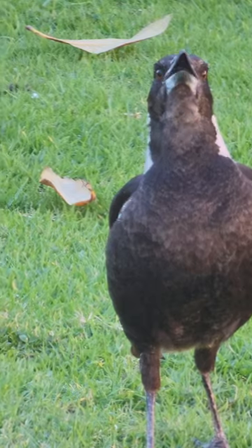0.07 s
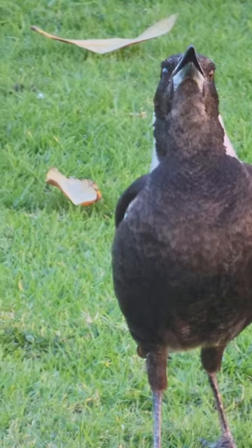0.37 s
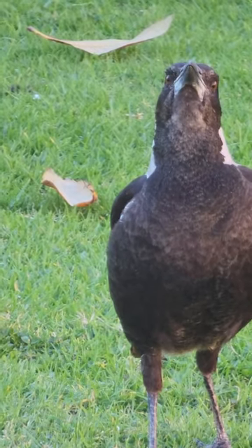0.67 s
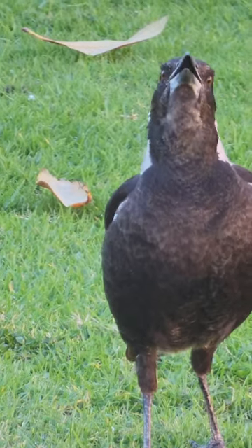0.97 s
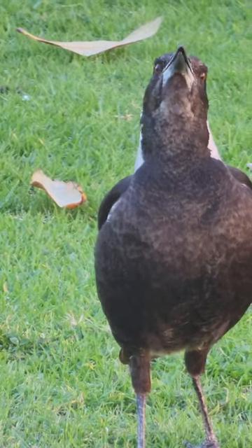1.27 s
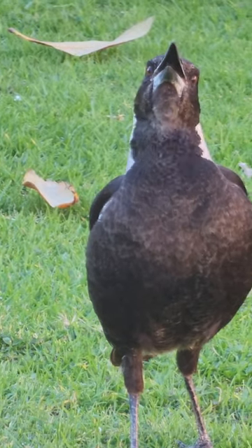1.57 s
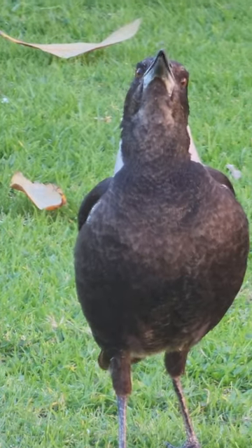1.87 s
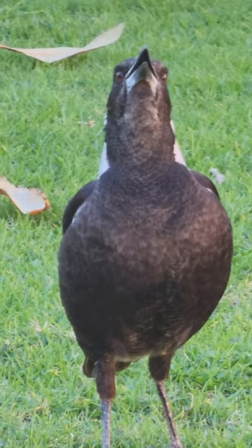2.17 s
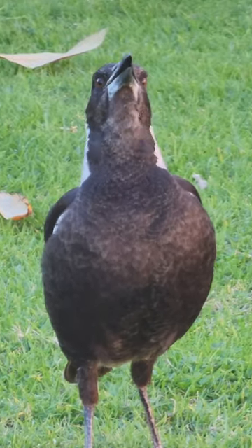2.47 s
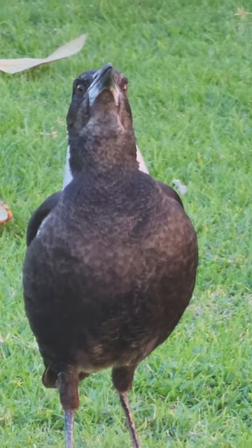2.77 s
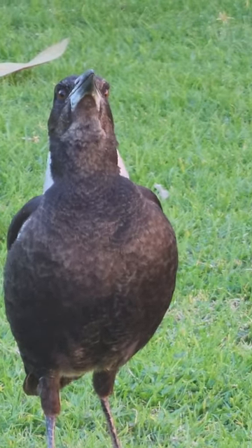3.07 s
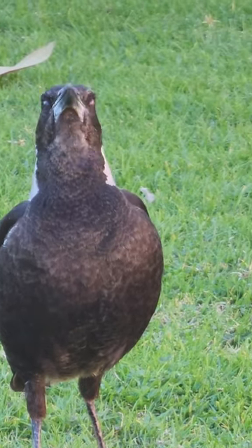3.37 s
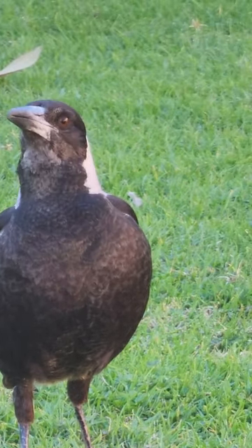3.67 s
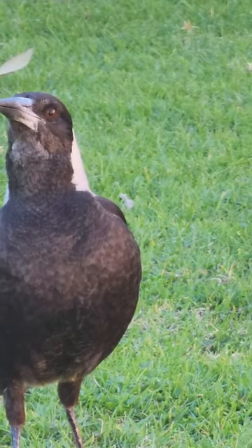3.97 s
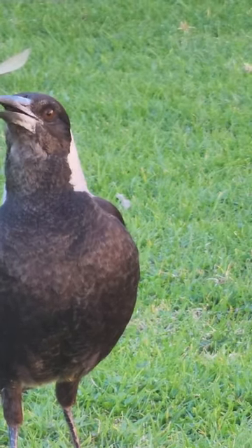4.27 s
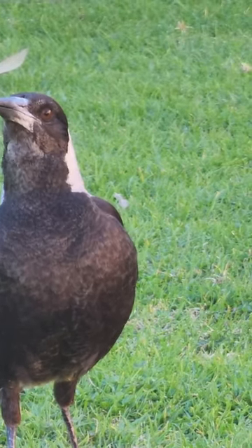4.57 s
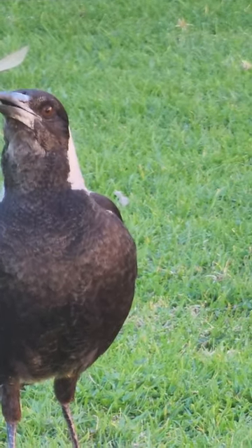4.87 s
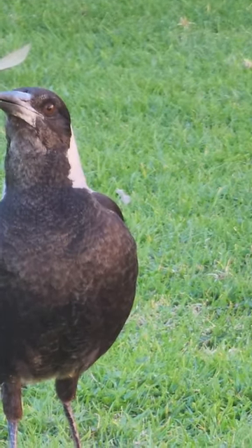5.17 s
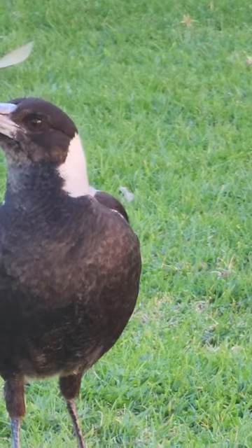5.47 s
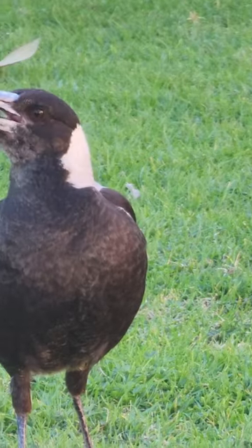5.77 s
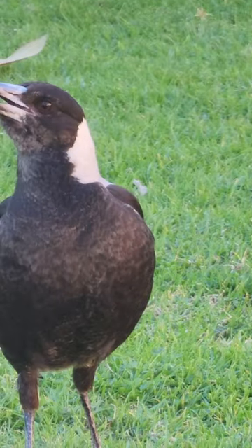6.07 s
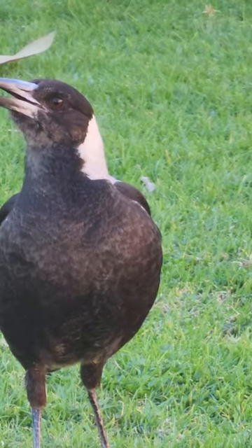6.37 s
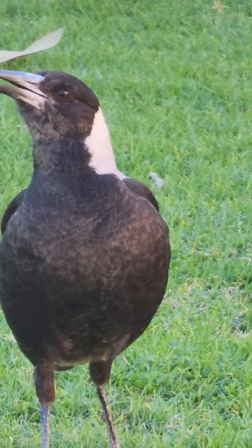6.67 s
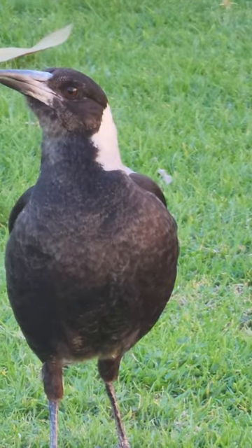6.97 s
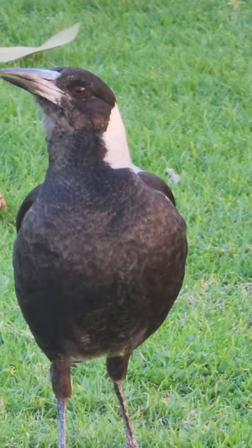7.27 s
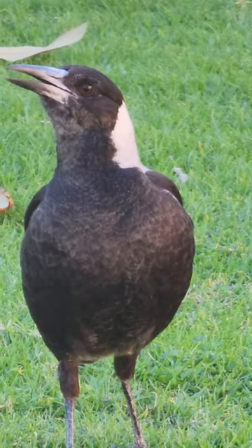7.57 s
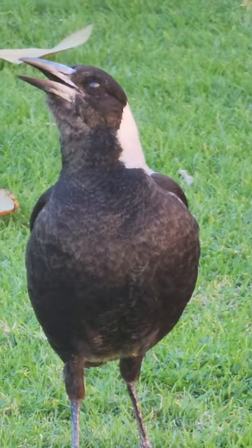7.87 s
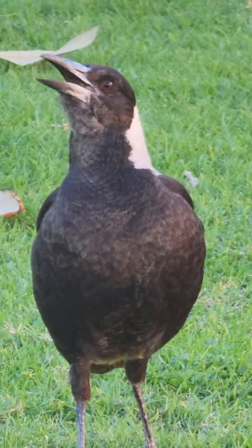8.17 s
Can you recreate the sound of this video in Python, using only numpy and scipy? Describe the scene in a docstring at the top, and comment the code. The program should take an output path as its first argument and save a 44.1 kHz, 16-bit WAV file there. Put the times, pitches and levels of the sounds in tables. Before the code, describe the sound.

A magpie warbles and carols close by in short gliding phrases with brief pauses, over a low outdoor rumble and light wind.

```python
"""A magpie warbles and carols close by on a lawn, over a low outdoor rumble with light wind.
Airflow sets a membrane vibrating on each side of its syrinx; the two sing gliding notes, often at once,
some pure and some fluttering. Throat and beak filter the overtones: one soft phrase is sung with the
beak shut, and later come two calls with it wide open. The garden reflects the song, and small birds
cheep faintly further off."""
import sys
import numpy as np
from scipy import signal
from scipy.fft import rfft, irfft
from scipy.io import wavfile
from scipy.ndimage import map_coordinates

SR = 44100
rng = np.random.default_rng(int(sys.argv[2]) if len(sys.argv) > 2 else 0)


def unload_wav(signal):
    """Save mono or channel-first audio to the path in sys.argv[1] as 16-bit WAV at rate SR, clipped to [-1, 1]."""
    wavfile.write(
        sys.argv[1],
        SR,
        np.round(np.clip(np.atleast_2d(signal).T, -1, 1) * 32767).astype(np.int16),
    )


N = 362061
TIME = np.arange(N) / SR

# Short notes of the warble. Levels in all tables are relative; roughness runs from 0 to about 1.
# start_s, rise_s, fall_s, start_hz, crest_hz, end_hz, fundamental_db, overtones_db, roughness
WARBLE_NOTES = [ (.11, 0.0028, 0.1, 1297, 1282, 1374, -36, -53, 0.65),
                (.11, 0.0056, 0.017, 1920, 1777, 1620, -28.5, -48, 0.54),
                (.3, .04, 0.047, 1147, 1074, 1057, -46, -70, 0.07),
                (.422, .006, 0.02, 1324, 1487, 2060, -15, -30.5, 0.29),
                (.446, 0.0094, 0.023, 1531, 1618, 1790, -19, -34, 0.36),
                (.474, .01, 0.039, 1754, 1667, 1360, -18.5, -40, 0.47),
                (.512, 0.0325, 0.042, 1420, 1358, 1327, -14.5, -33, 0.23),
                (.973, 0.0052, 0.022, 1945, 1870, 1630, -34, -52, 0.25),
                (1.006, 0.0041, 0.05, 1623, 1723, 1685, -28.5, -44.5, 0.48),
                (1.055, .017, 0.092, 1476, 1367, 1274, -19, -30.5, 0.25),
                (1.13, .066, 0.02, 1317, 1263, 1210, -15.5, -31.5, 0.11),
                (1.08, .115, 0.023, 860, 840, 770, -37, -66, 0.33),
                (1.236, .008, 0.058, 1483, 1582, 1190, -29.5, -49, 0.88),
                (1.312, 0.042, 0.07, 1014, 985.9, 1041, -30, -53.5, 0.11),
                (1.385, 0.038, 0.008, 1460, 1525, 1560, -27.5, -37, 0.64),
                (1.432, .009, 0.015, 685, 665, 853, -28.5, -54, 0.13),
                (1.44, 0.041, .01, 1027, 1043, 1055, -36.5, -54, 0.23),
                (1.497, 0.017, 0.012, 768, 790, 814, -32.5, -55, 0.25),
                (1.527, .016, .011, 1449, 1573, 1390, -8.5, -26, 0.12),
                (1.552, 0.0037, 0.027, 1406, 1370, 1416, -17.5, -24.5, 0.77),
                (1.578, .03, 0.016, 1006, 861, 850, -37, -45, 0),
                (1.585, 0.057, 0.024, 1934, 1580, 1620, -18.5, -40, 0.18),
                (1.66, 0.02, 0.0068, 1566, 1580, 1580, -25, -55, 0.5),
                (1.66, .095, 0.047, 1294, 1323, 1260, -35.5, -39.5, 0.11),
                (1.7, .1, 0.052, 2394, 2525, 2470, -26, -29, 0.58),
                (1.815, .04, 0.069, 1064, 1036, 1099, -31.5, -38, 0.43),
                (1.89, 0.032, 0.057, 1103, 1083, 1043, -25.5, -54.5, 0.07),
                (2.019, .012, .095, 1396, 1337, 1373, -26, -40.5, 0.65),
                (2.12, .04, 0.014, 1373, 1439, 1670, -13.5, -32, 0.37),
                (2.076, .039, 0.029, 725.6, 719, 792, -33.5, -45, 0),
                (2.225, 0.026, 0.019, 1080, 1072, 1049, -29, -48, 0.2),
                (2.29, .025, 0.081, 1543, 1555, 1470, -27.5, -48.5, .1),
                (2.438, 0.01, 0.0092, 856, 818, 840, -21.5, -41, .15),
                (2.455, 0.073, 0.014, 1524, 1573, 1580, -36.5, -38, 0.44),
                (2.54, 0.017, 0.047, 1128, 1123, 1085, -29, -42.5, 0.34),
                (2.657, 0.0026, 0.0088, 1910, 1790, 1584, -32, -52, 0.23),
                (2.678, 0.0085, 0.049, 1480, 1475, 1477, -21.5, -44.5, 0.37),
                (2.732, 0.02, 0.028, 867, 749.5, 833, -30.5, -50.5, .1),
                (2.864, .007, 0.047, 605, 689, 904, -30, -54.5, 0.3),
                (2.898, .024, 0.043, 778, 765, 660, -24, -54, 0.1),
                (2.972, .005, 0.0088, 805, 890, 1110, -27, -43, 0.44),
                (2.99, 0.036, 0.031, 1081, 1049, 1070, -32, -54.5, 0.08),
                (3.048, 0.015, 0.03, 561, 785, 562, -33, -61, 0.42),
                (3.106, .014, .032, 1228, 1248, 1212, -38.5, -57, 0.3),
                (3.178, .06, 0.074, 757, 831, 830, -22, -47, 0.06),
                (3.265, 0.0746, 0.035, 1034, 1030, 1000, -29.5, -44.5, 0.25),
                (3.358, 0.05, 0.032, 1460, 1535, 1598, -39.5, -50, 0.08),
                (3.426, 0.016, 0.053, 907, 1107, 1105, -36, -47, 0.22),
                (3.788, .007, 0.015, 735, 683, 656, -25, -55, 0.15),
                (3.812, 0.035, 0.018, 789.6, 848, 890, -38, -66, 0.6),
                (3.88, 0.034, 0.042, 794.8, 848, 996, -31, -54.5, 0.29),
                (3.945, 0.044, .03, 1034, 1073, 976, -37, -56, 0),
                (4.01, .085, 0.037, 978, 1011, 970, -24.5, -45, 0.18),
                (3.955, .021, 0.022, 609, 737, 545, -33, -55.5, 0.38),
                (4.03, .015, 0.014, 627, 800, 885, -26.5, -54, 0.48),
                (4.052, .046, 0.033, 855, 918, 872, -21.5, -44.5, 0.16),
                (4.16, 0.0091, 0.048, 566, 617, 827, -37, -60, .45),
                (4.22, .012, 0.011, 825, 756.5, 800, -22.5, -47, 0.3),
                (4.25, .033, 0.026, 802, 874, 810, -36, -55, 0.42),
                (4.318, .018, 0.08, 688, 634, 601.5, -27.5, -52, .03),
                (4.405, .025, 0.022, 603, 727, 1080, -32.5, -52.5, 0.19),
                (4.473, 0.031, .017, 955, 983, 930, -30, -44.5, .18),
                (4.508, 0.012, 0.033, 962, 866, 861, -25, -44.5, 0.16),
                (4.753, 0.0064, 0.0071, 892, 772, 840, -20, -43.5, 0.54),
                (4.77, 0.0089, 0.028, 859, 885, 886, -33.5, -50, 0.37),
                (4.845, .029, 0.054, 664, 632.5, 665, -26, -51.5, 0.01),
                (4.912, 0.023, 0.053, 662, 731, 669, -25.5, -50.5, 0.2),
                (5.032, 0.0397, 0.029, 1049, 964, 965, -25, -44, 0.21),
                (5.214, .005, 0.016, 899, 788, 647, -25, -52.5, 0.37),
                (5.234, 0.012, 0.011, 686, 888, 982, -32, -59, 0),
                (5.685, 0.027, 0.043, 1664, 1724, 1710, -38, -55, 1.06),
                (5.806, 0.0072, 0.03, 1790, 1644, 1380, -22, -31, 0.5),
                (5.839, 0.0031, 0.026, 1550, 1446, 1550, -19, -30, 0.8),
                (6.132, .031, 0.011, 1349, 1268, 1250, -23, -38.5, 0.65),
                (6.169, 0.012, 0.0046, 1394, 1765, 1930, -13.5, -26.5, 0),
                (6.202, 0.012, 0.03, 1980, 1760, 1713, -29, -40, 0.88),
                (6.548, 0.024, 0.026, 1306, 1400, 1496, -16.5, -38, 0.27),
                (7.226, 0.023, 0.026, 996, 969, 1009, -33.5, -85, 0.29),
                (7.31, .025, .04, 1420, 1385, 1325, -33, -60, 0.11),
                (7.375, 0.027, .08, 1012, 913, 880, -27, -51, 0.18),
                (7.488, 0.027, 0.0082, 790, 833, 830, -40, -48.5, 0.42),
                (7.52, 0.0876, 0.015, 1110, 1151, 1175, -30.5, -39, 0.42),
                (7.699, 0.029, .04, 1394, 1293, 1233, -25.5, -42.5, 0.48),
                (7.77, .007, 0.024, 956, 1028, 1160, -31, -42, 0.42),
                (7.915, 0.058, 0.15, 983, 975, 956, -44, -37.5, 0.22),
                (8.115, .035, 0.0074, 899, 803, 788, -38.5, -55, 0.01),
                (8.165, 0.052, .01, 1060, 1097, 1055, -21.5, -38, 0.18), ]
# Long carols, one curve each: time_s, pitch_hz, fundamental_db, overtones_db, roughness
CAROL_CURVES = [
    [(.215, 1664, -35, -41, 0.71), (.25, 1601, -20, -32.5, 0.99), (.27, 1588, -13, -35.5, 0.18),
     (.32, 1516, -20, -33.5, 0.1), (.392, 1437, -15, -29.5, 0.03), (.418, 1190, -25.5, -31.5, 0.26)],
    [(2.185, 1380, -25, -51, 0.6), (2.215, 1390, -20, -25.5, 0.63), (2.24, 1317, -15, -28.5, 0.2),
     (2.28, 1308, -17, -29, 0), (2.37, 1301, -21, -32, 0.03), (2.41, 1300, -25.5, -31.5, 0.8),
     (2.45, 1300, -29.5, -51, 0.97), (2.52, 1357, -27, -42.5, 1.07)],
    [(6.6, 1750, -41, -41, 0.8), (6.655, 1832, -30, -30.5, 0.36), (6.68, 1680, -27, -31.5, 0.34),
     (6.7, 1320, -24.5, -35, .26), (6.745, 1253, -21, -38, 0.1), (6.775, 1256, -28, -46, 0),
     (6.8, 1263, -31, -49, 0.1), (6.88, 1249, -36, -88, .08)],
    [(7.785, 1654, -42.5, -49, 0.8), (7.835, 1575, -23, -35.5, 0.3), (7.865, 1607, -20.5, -36, 0.28),
     (7.95, 1460, -14.5, -25, 0.25), (8.0, 1418, -17, -26.5, 0.3), (8.085, 1360, -21, -30, 0.35),
     (8.11, 1419, -19, -31.5, 0.34), (8.135, 1232, -28.5, -36.5, 0.2), (8.17, 1092, -42, -55, 0.4)],
]
# Response of throat and beak in ordinary song: frequency_hz, gain_db
SONG_TRACT = [(400, -12), (1400, 6.5), (2100, -6), (2450, 0), (2800, -12), (3150, -2), (3500, -10),
              (3850, -4.5), (4200, -9.5), (4850, 0.5), (5700, -5), (6200, -17.5), (6900, -13), (7700, -16),
              (8700, -19), (10500, -18.5), (11400, -23.5), (13100, -10.5), (14200, -21.5), (15200, -21)]
# Left channel over right for the birds: frequency_hz, difference_db
STEREO_BALANCE = [(700, 2.5), (1300, 2), (2300, -1), (4400, 1.5), (8100, 4), (14000, 10)]
# Course of the wind and distant rumble: time_s, deep_level_db, upper_level_db
RUMBLE_LEVELS = [(0.14, -46, -40.5), (0.27, -26.5, -35), (0.4, -32, -42.5), (0.67, -25.5, -32),
                 (1.2, -35.5, -37.5), (1.46, -30, -34), (2.25, -45.5, -40.4), (2.649, -25, -34),
                 (2.78, -37, -34.5), (3.44, -26.5, -37), (3.58, -31.5, -39), (3.97, -38.3, -38),
                 (4.1, -34.4, -35.8), (4.37, -46.5, -40.0), (4.9, -26.5, -41), (5.03, -39.5, -39.5),
                 (7.01, -42.5, -45.5), (8.2, -32.5, -43.5)]
# Spectra of the deep rumble, the upper rumble and the open air: frequency_hz, density_db
DEEP_SPECTRUM = [(15, -6), (25, -4), (40, 5.5), (58, 9), (80, 4.5), (110, -17.5), (160, -68)]
UPPER_SPECTRUM = [(55, -13), (90, 6.5), (130, 6.5), (160, 1.5), (200, -7), (260, -9), (400, -53.5)]
AIR_SPECTRUM = [(150, -6), (260, 0), (400, -4), (650, -6), (1200, -8), (2000, -17), (3000, -27),
                (5000, -33), (8000, -37), (10000, -46), (15500, -47)]
# Thin cheeps of distant birds: start_s, length_s, start_hz, end_hz, level_db
DISTANT_CHEEPS = [(0.73, 0.057, 6070, 5500, -65), (4.492, 0.17, 2985, 2950, -51),
                  (4.518, 0.15, 4240, 3850, -61.5)]
# Response of the throat with the beak shut, then wide open: frequency_hz, gain_db
SHUT_TRACT = [(400, -24), (1300, 8.5), (2000, -3.5), (2600, -9.5), (3050, -8.5), (3700, -17), (5000, -8),
              (5800, -1), (6500, -13), (7200, -6), (9000, -18.5), (11500, -19.5), (13300, -11.5),
              (14500, -17)]
OPEN_TRACT = [(900, 2.5), (1750, 13.5), (2600, -9), (3500, -12.5), (4200, -18), (5200, -1), (6000, -7),
              (7000, -25), (8200, -8.5), (9500, -39), (10800, -24), (11900, -34), (13200, -23),
              (15500, -34)]
# Two open-beak calls of two syllables each:
# start_s, length_s, pitch_hz, end_hz, overshoot_hz, flick_hz, fundamental_db, overtones_db
CALL_SYLLABLES = [ (5.753, 0.052, 901, 873, 330, -3, -42, -33),
                  (5.836, 0.17, 925.6, 883, 380, 40, -37, -32), (6.236, 0.083, 873, 842, 32, 22, -36, -39),
                  (6.325, 0.15, 886, 817.6, 12, -23, -36, -34), ]

ONSET_S, TOP_HZ = 0.113, 15800
SHUT_FROM_S, SHUT_TO_S = 3.7, 5.4  # the phrase sung with the beak shut


def undb(db):
    """Amplitude ratio of a level in decibels."""
    return 10 ** (np.asarray(db) / 20)


def unit_rms(x):
    """Normalisation to an rms of 1."""
    return x / np.sqrt(np.mean(x ** 2))


def wobble(n, hz):
    """Random modulation, band-limited to about hz, with a spread near 1."""
    knots = rng.standard_normal(512)
    return map_coordinates(knots, [np.arange(n) * 2 * hz / SR], order=3, mode="wrap")


def gains(curve):
    """Frequency response: a decibel curve interpolated over log frequency, one gain per bin."""
    hz, db = np.transpose(curve)
    bins_hz = np.fft.rfftfreq(N, 1 / SR)
    return undb(np.interp(np.log(np.maximum(bins_hz, 1)), np.log(hz), db))


def filtered(source, curve):
    """Linear filtering: the source spectrum is multiplied by a frequency response."""
    return irfft(rfft(source) * gains(curve), N)


def warble_note(start_s, rise_s, fall_s, start_hz, crest_hz, end_hz, db, over_db, rough):
    """Threshold of voicing: a note's curve rises from near it to a crest and is roughest at the ends."""
    threshold_db = -43.5
    t = np.arange(-rise_s, fall_s, 1 / 2000)
    away = np.abs(t) / np.where(t < 0, rise_s, fall_s)  # 0 at the crest, 1 at both ends
    edge_hz = np.where(t < 0, start_hz, end_hz)
    hz = crest_hz + (edge_hz - crest_hz) * away ** 1.35  # the pitch lingers at the crest
    drop_db = np.where(t < 0, 0.51, 0.47) * (db - threshold_db) * away ** 0.71
    roughness = rough * (1 + 0.64 * away)
    return np.transpose([start_s + rise_s + t, hz, db - drop_db, over_db - 0.41 * drop_db, roughness])


def membrane(curve, edge_s=0.007, trill_hz=110, trill=0.27, gargle=0.42, flutter=0.48, tremble_db=1.5):
    """Amplitude and phase modulation: one side of the syrinx follows a curve, unsteadily if rough."""
    times, *columns = np.transpose(curve)
    at = np.arange(int((times.min() - edge_s) * SR), min(N, int((times.max() + edge_s) * SR)))
    t, n = TIME[at], len(at)
    hz, db, over_db, rough = (np.interp(t, times, column) for column in columns)
    from_edge_s = np.minimum(t - t[0], t[-1] - t)
    envelope = np.sin(np.pi / 2 * np.clip(from_edge_s / (2 * edge_s), 0, 1)) ** 2
    # even a pure note trembles a little in pitch and strength
    hz *= 1 + 0.0045 * wobble(n, 30.12)
    envelope *= undb(tremble_db * wobble(n, 39.8))
    # rough notes beat in a fast uneven trill; every other beat is weaker, so they gargle
    trill_phase = 2 * np.pi * np.cumsum(trill_hz * (1 + 0.12 * wobble(n, 30.3))) / SR
    envelope *= 1 + gargle * np.sqrt(np.abs(rough)) * np.sin(trill_phase / 2)
    swing = 1 + rough * (trill * np.sin(trill_phase) + flutter * wobble(n, 170))
    swing_rms = np.sqrt(1 + rough ** 2 * (trill ** 2 / 2 + flutter ** 2))
    envelope *= swing / swing_rms
    phase = 2 * np.pi * np.cumsum(hz) / SR + rough * wobble(n, 190)  # the cycles scatter
    return at, hz, phase, envelope * undb(db), envelope * undb(over_db), rough


def syrinx(curves, tract, tone_db, overtone_db, even_db, coupling, rasp, hoarse, rush):
    """Source and filter: two coupled membranes sound, and the tract gathers their overtones into bands."""
    voices = [membrane(curve) for curve in curves]
    tones, drive, buzz = np.zeros((3, N))
    for at, hz, phase, fundamental, overtones, rough in voices:
        tones[at] += fundamental * np.sin(phase)
        drive[at] += np.abs(fundamental)
    for at, hz, phase, fundamental, overtones, rough in voices:
        n = len(at)
        # when both sides sound, each bends the other's cycle and makes sidebands
        other_drive = np.maximum(drive[at] - np.abs(fundamental), 0)
        other_side = (tones[at] - fundamental * np.sin(phase)) / np.sqrt(drive[at] * other_drive + 1e-10)
        # the moment of closing scatters, which smears the high overtones most
        closing = 2 * np.pi * np.cumsum(hz) / SR + coupling * other_side + rasp * rough * wobble(n, 220)
        # rough or hard-pushed notes are hoarse: each overtone widens into a reedy band
        spread = hoarse * (np.sqrt(np.abs(fundamental) / drive.max()) + np.abs(rough))
        for k in range(2, int(TOP_HZ / hz.min()) + 1):
            harmonic_db = even_db * (2.5 - k % 2) + rng.uniform(-4, 4)
            weight = undb(harmonic_db) * (k * hz < SR / 2)
            buzz[at] += overtones * weight * np.sin(k * closing + spread * wobble(n, 165))
        # air rushes through the gap once a cycle and fills in between the overtones
        buzz[at] += overtones * rush * (1 + np.cos(phase)) * rng.standard_normal(n)
    return np.sqrt(2) * (undb(tone_db) * tones + undb(overtone_db) * filtered(buzz, tract))


def stereo_arrival(sound, lag_s=51e-6):
    """Path difference and shadowing: the right microphone hears later, its treble shaded by the housing."""
    delay = np.exp(-2j * np.pi * np.fft.rfftfreq(N, 1 / SR) * lag_s)
    left_over_right = gains(STEREO_BALANCE)
    pair = np.array([left_over_right, delay]) * np.sqrt(2 / (1 + left_over_right ** 2))
    return irfft(rfft(sound) * pair, N)


def garden(sound, near_t60_s=0.35, echo_s=0.13, echo_spread_s=0.076, tail_t60_s=0.9, dull_hz=2600):
    """Reflection: quick returns from things close by, a smeared far echo and a short dull tail."""
    t = TIME[:SR]
    near, echo, tail = rng.standard_normal((3, 2, SR))
    build_up = np.clip(t / 0.0039, 0, 1)
    near = undb(-8.5) * unit_rms(near * build_up * undb(-60 * t / near_t60_s))
    echo = undb(-21) * unit_rms(echo * np.exp(-((t - echo_s) / echo_spread_s) ** 2))
    tail = undb(-18) * unit_rms(tail * build_up * undb(-60 * t / tail_t60_s))
    far = signal.sosfilt(signal.butter(1, dull_hz, fs=SR, output="sos"), echo + tail)
    impulse_response = (near + far) / np.sqrt(SR)
    return signal.fftconvolve(sound, impulse_response, axes=1)[:, :N]


def stereo_noise(spectrum, side_db):
    """Partial coherence: a side signal of opposite sign in each channel widens noise of rms 1."""
    mid, side = filtered(rng.standard_normal((2, N)), spectrum)
    return unit_rms(mid + undb(side_db) * np.array([side, -side]))


def outdoors(buffet_db=2.5, hum_hz=57.1, hum_db=-43.5, air_db=-49):
    """Superposition: two bands of wind-buffeted rumble, a wavering distant hum and soft open air."""
    times, *levels = np.transpose(RUMBLE_LEVELS)
    deep_db, upper_db = (np.interp(TIME, times, level) for level in levels)
    deep = stereo_noise(DEEP_SPECTRUM, side_db=-4.5) * undb(deep_db + buffet_db * wobble(N, 5.8))
    upper = stereo_noise(UPPER_SPECTRUM, side_db=-7) * undb(upper_db + 1 + buffet_db * wobble(N, 10))
    hum_phase = 2 * np.pi * np.cumsum(hum_hz + 1.24 * wobble(N, 1.3)) / SR
    hum = np.sqrt(2) * undb(hum_db) * np.sin(hum_phase)
    air = stereo_noise(AIR_SPECTRUM, side_db=-7) * undb(air_db + 0.6 * wobble(N, 3))
    return deep + upper + hum + air


def cheeps(waver=0.034):
    """Frequency modulation: small birds further off sing short tones that waver as they fall."""
    out = np.zeros(N)
    for start_s, length_s, start_hz, end_hz, db in DISTANT_CHEEPS:
        n, i = int(length_s * SR), int(start_s * SR)
        hz = np.linspace(start_hz, end_hz, n) * (1 + waver * wobble(n, 150))
        out[i:i + n] += 2 * undb(db) * np.hanning(n) * np.sin(2 * np.pi * np.cumsum(hz) / SR)
    return out


def call_syllable(start_s, length_s, pitch_hz, end_hz, overshoot_hz, flick_hz, db, over_db):
    """Onset and release transients: a call's curve starts sharp and rough, settles, swells and flicks."""
    settle_s, flick_s, swell_db, rough_per_hz = 0.06, 0.017, 1, 0.0024
    t = np.arange(0, length_s, 1 / 2000)
    sharp = overshoot_hz * np.maximum(1 - t / settle_s, 0)
    flick = flick_hz * np.maximum(1 - (length_s - t) / flick_s, 0)
    to_go = 1 - t / length_s
    hz = end_hz + (pitch_hz - end_hz) * to_go + sharp + flick
    drop_db = swell_db * to_go
    return np.transpose([start_s + t, hz, db - drop_db, over_db - drop_db, rough_per_hz * sharp])


def scene():
    """Direct and reverberant fields: the birds, their reflections and the background add together."""
    song_curves = [warble_note(*row) for row in WARBLE_NOTES if not SHUT_FROM_S < row[0] < SHUT_TO_S]
    shut_curves = [warble_note(*row) for row in WARBLE_NOTES if SHUT_FROM_S < row[0] < SHUT_TO_S]
    call_curves = [call_syllable(*row) for row in CALL_SYLLABLES]
    song = syrinx(song_curves + CAROL_CURVES, SONG_TRACT, tone_db=-0.28, overtone_db=-2, even_db=-2.5,
                  coupling=0.38, rasp=0.6, hoarse=1.3, rush=0.56)
    soft_phrase = syrinx(shut_curves, SHUT_TRACT, tone_db=0, overtone_db=-3, even_db=-2,
                         coupling=0.39, rasp=0.78, hoarse=1.46, rush=0.6)
    calls = syrinx(call_curves, OPEN_TRACT, tone_db=1, overtone_db=-1.5, even_db=0,
                   coupling=0.5, rasp=0.92, hoarse=0.18, rush=0.088)
    birds = stereo_arrival(song + cheeps() + soft_phrase + calls)
    return birds + garden(birds) + outdoors()


def record(dry):
    """Gating and band-limiting: a moment of silence, then the sound through a steep low-pass filter."""
    low_pass = signal.ellip(10, 0.2, 80, TOP_HZ, fs=SR, output="sos")
    return signal.sosfilt(low_pass, dry * (TIME >= ONSET_S))


dry = scene()
out = record(dry)
unload_wav(out)
```